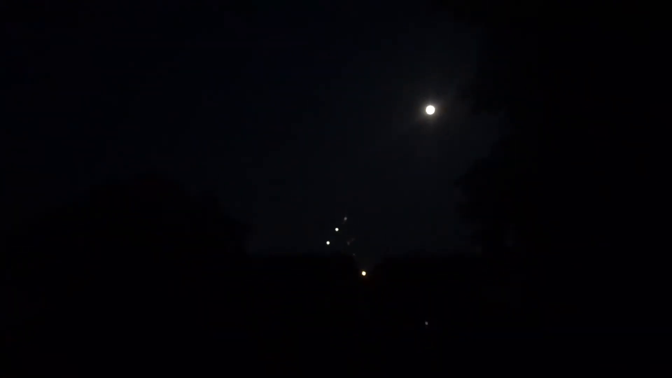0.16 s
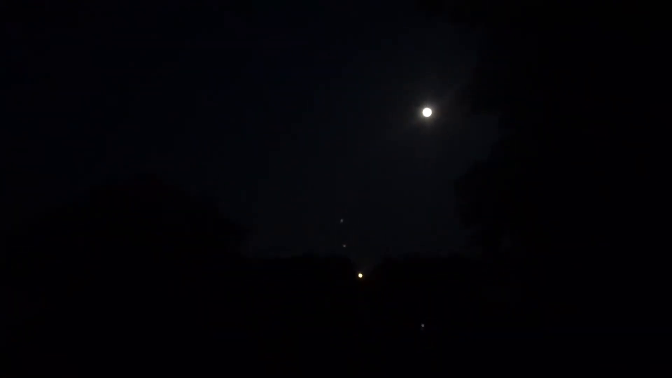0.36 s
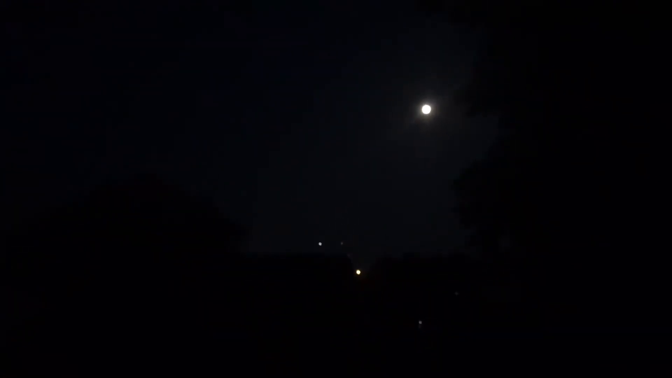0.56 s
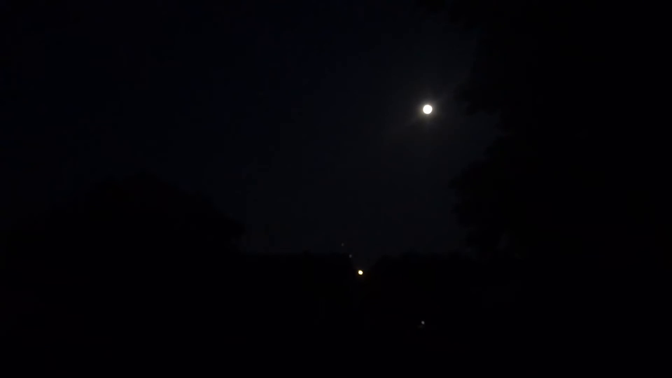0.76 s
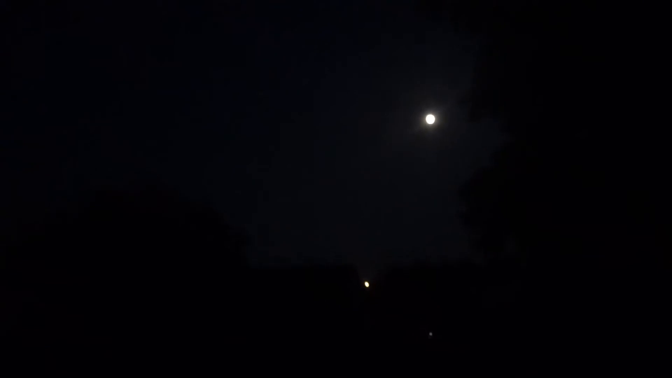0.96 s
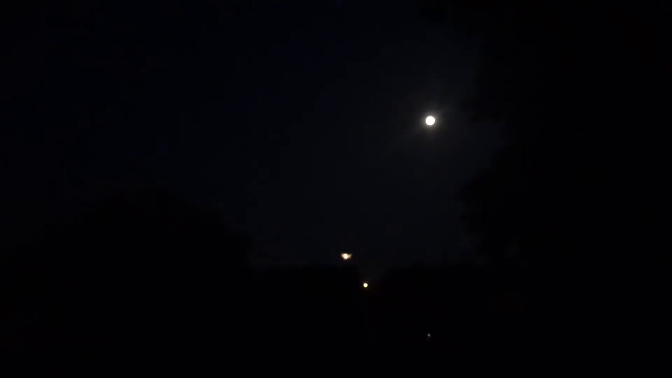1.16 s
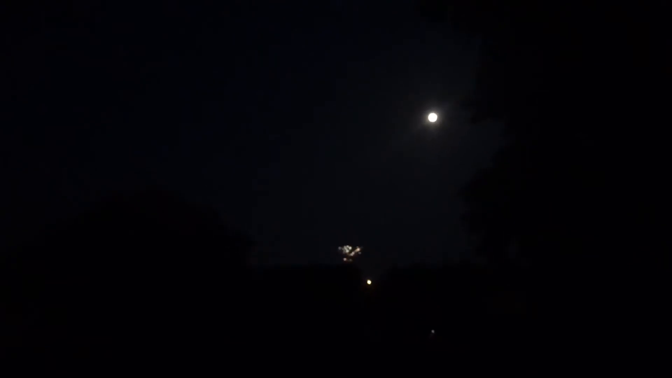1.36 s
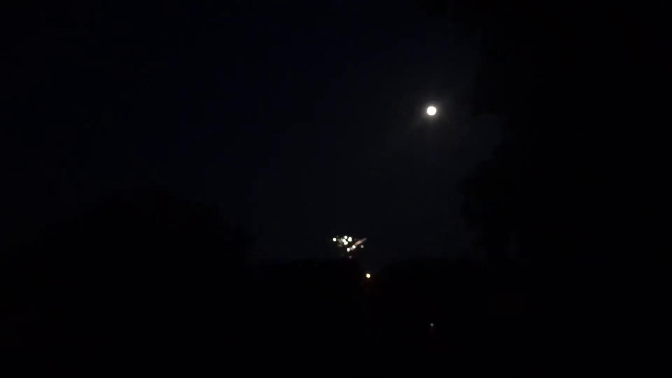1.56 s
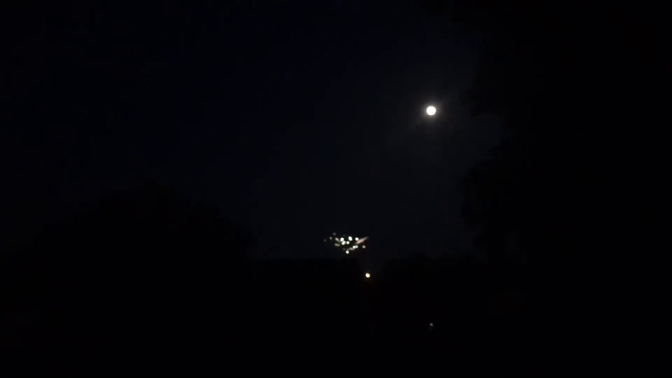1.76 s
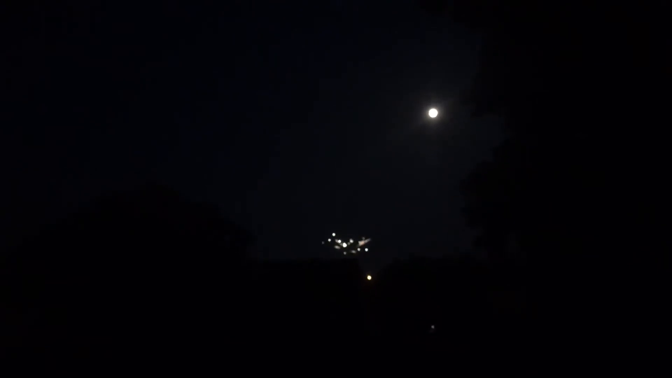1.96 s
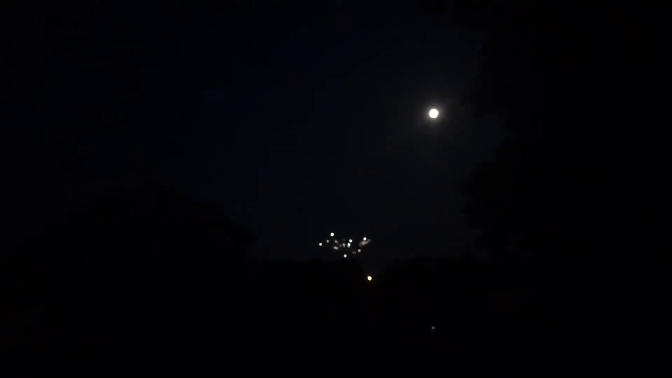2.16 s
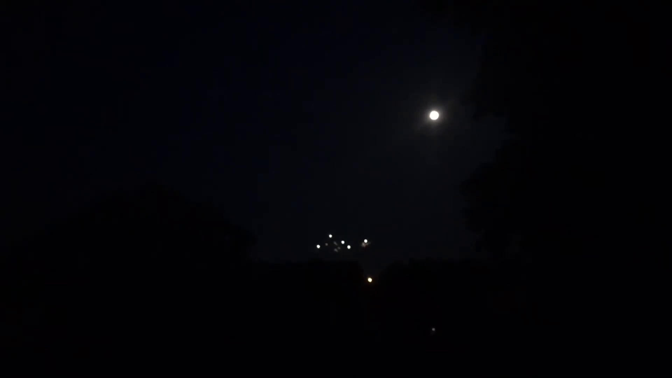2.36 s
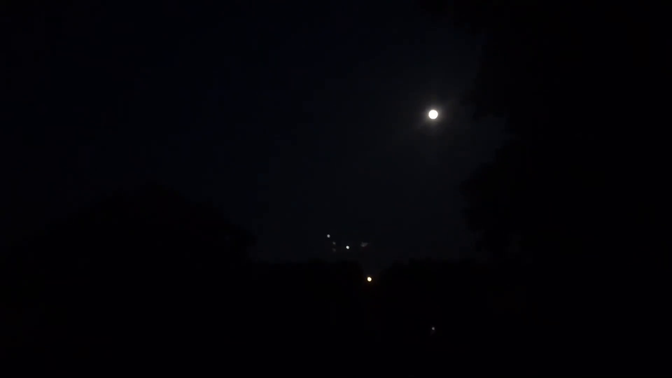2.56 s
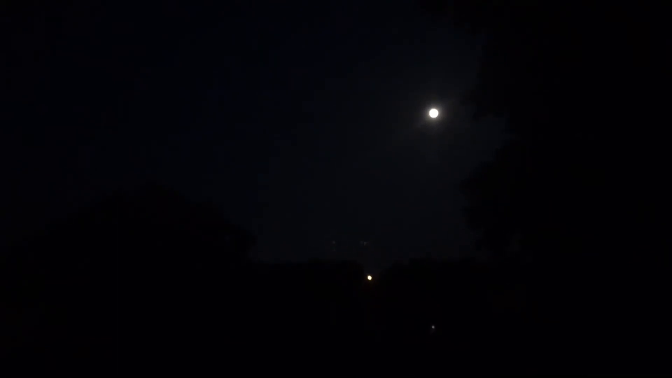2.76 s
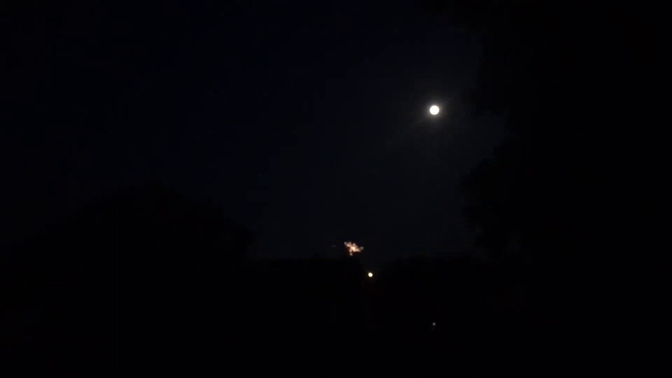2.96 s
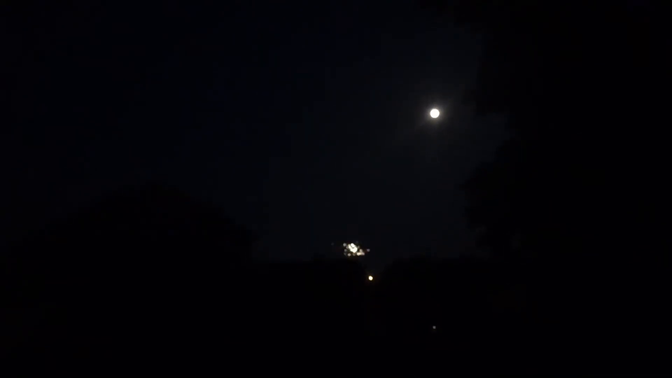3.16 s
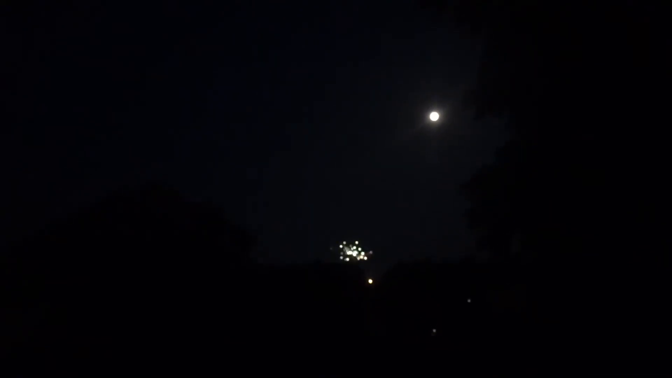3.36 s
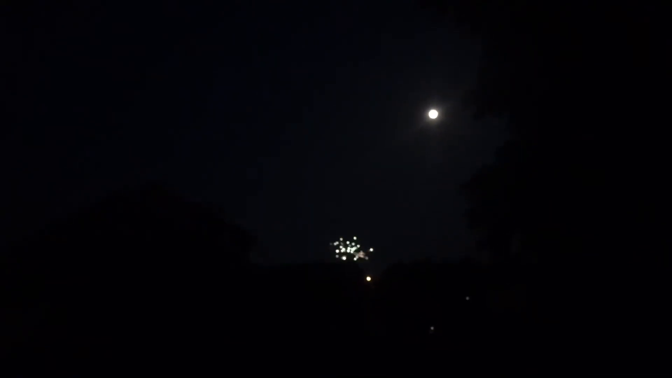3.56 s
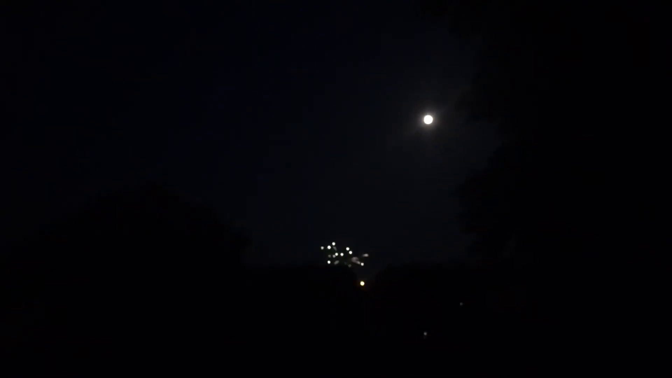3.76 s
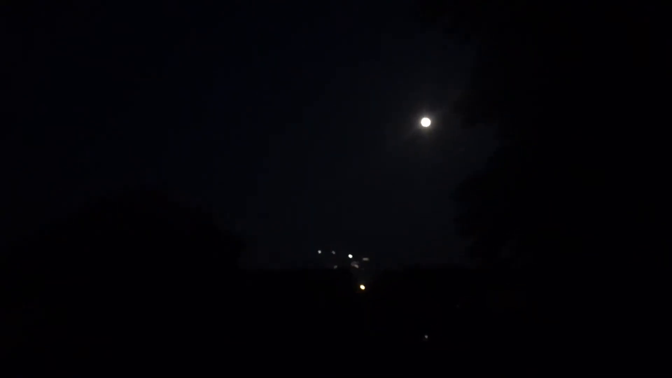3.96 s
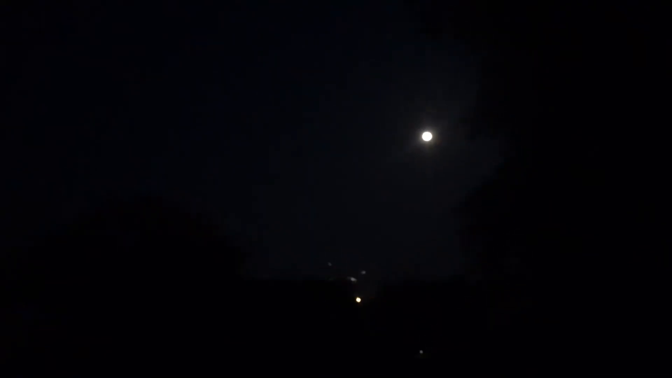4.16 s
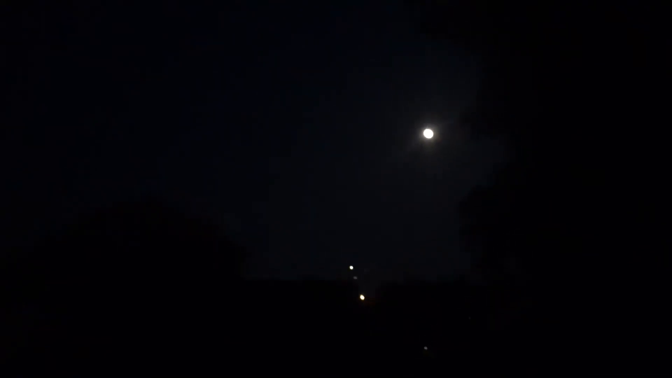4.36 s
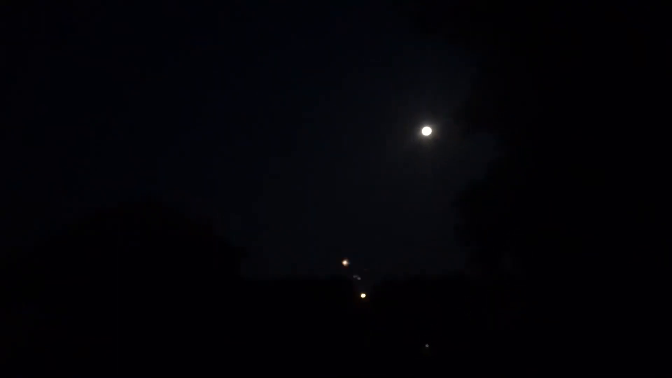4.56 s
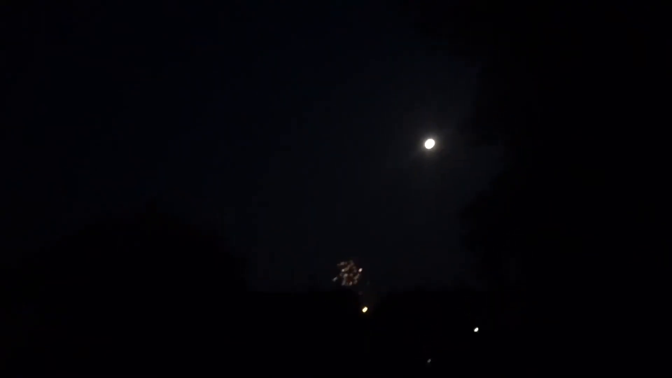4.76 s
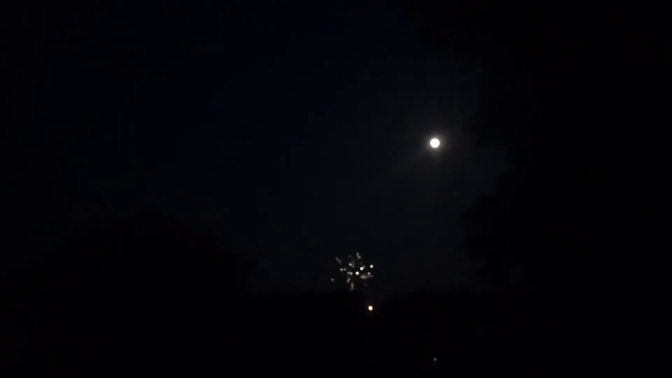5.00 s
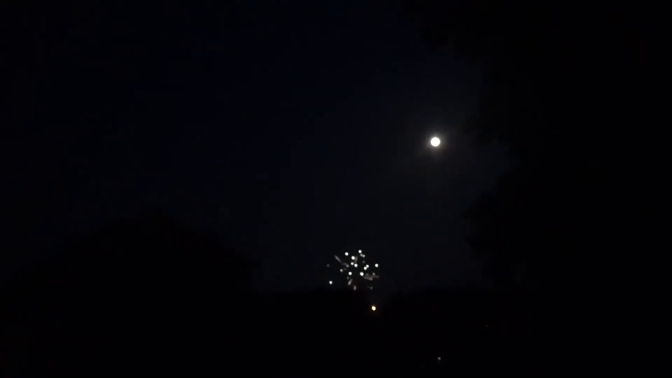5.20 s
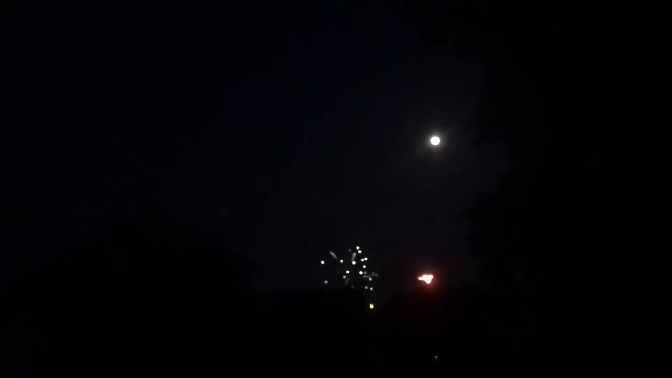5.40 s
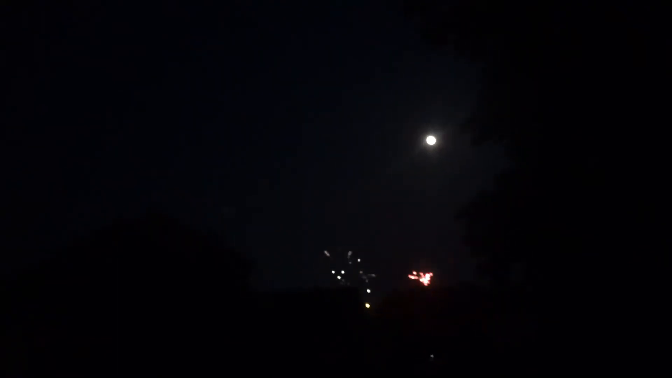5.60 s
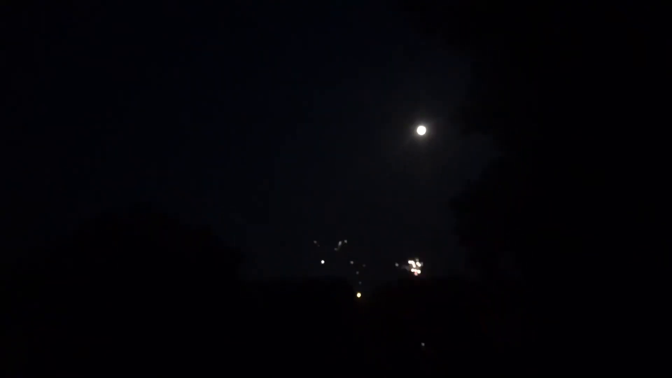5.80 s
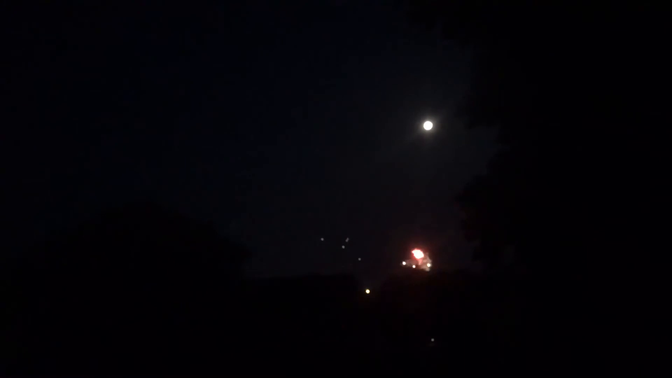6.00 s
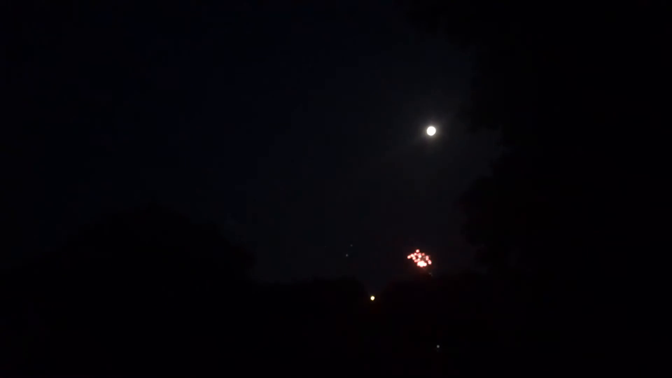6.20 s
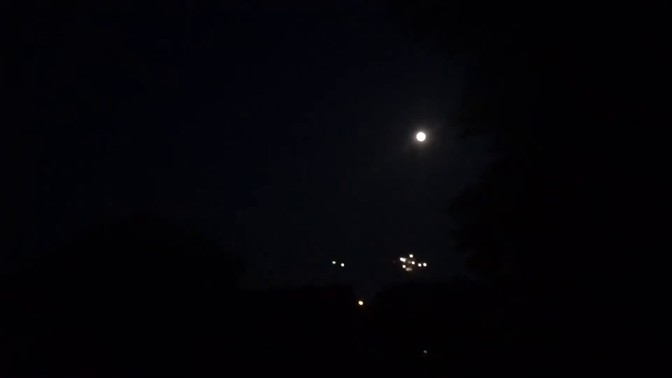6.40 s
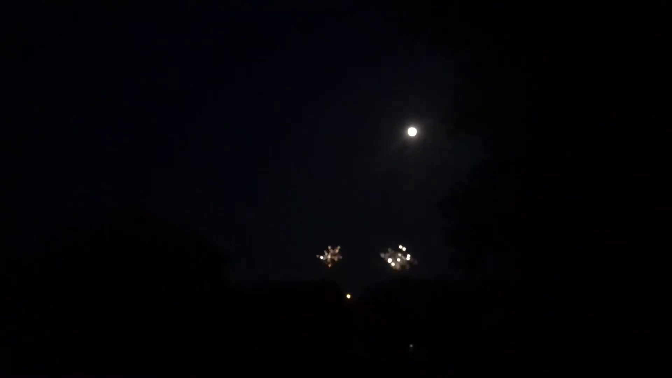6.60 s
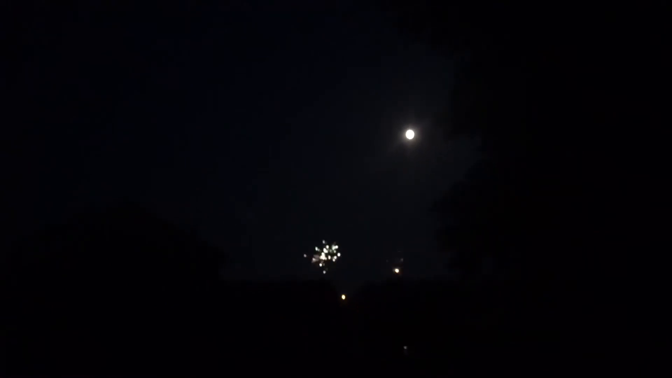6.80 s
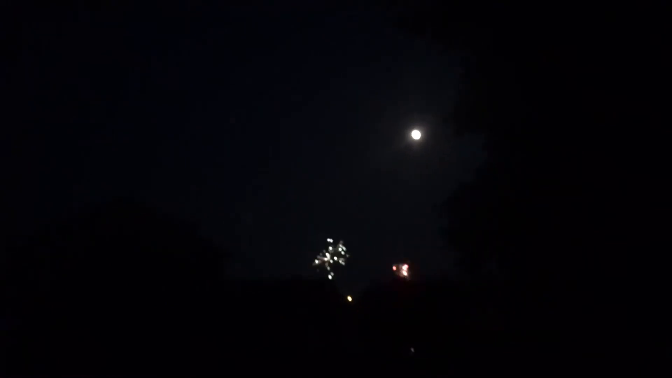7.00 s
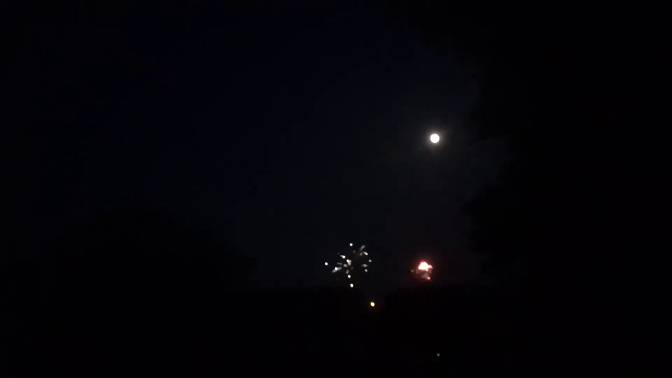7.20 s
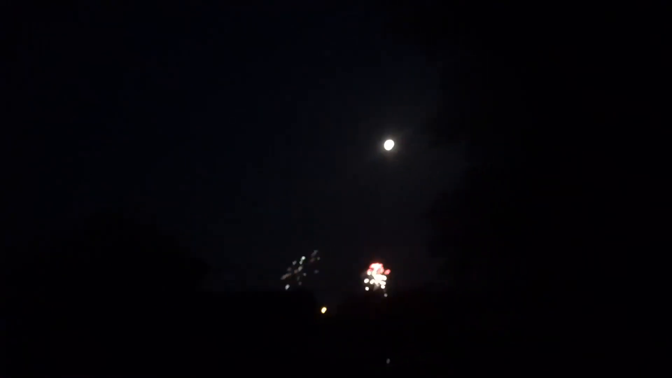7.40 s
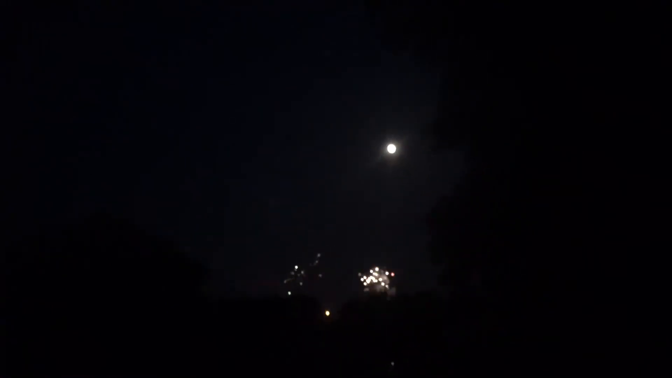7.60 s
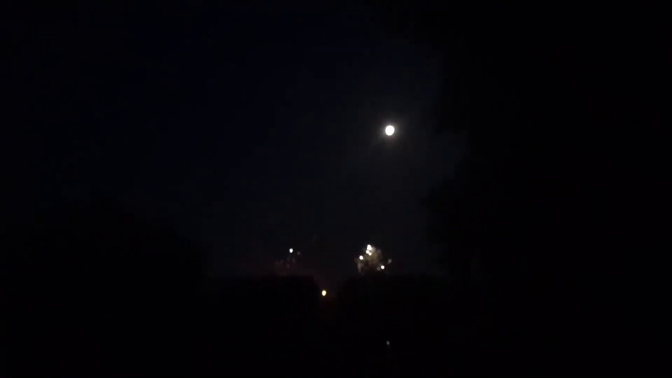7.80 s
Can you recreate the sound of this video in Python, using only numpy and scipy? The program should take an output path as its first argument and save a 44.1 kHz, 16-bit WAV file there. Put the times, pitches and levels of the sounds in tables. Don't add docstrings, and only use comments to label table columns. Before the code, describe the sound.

A night-time outdoor scene with distant fireworks beyond rooftops, heard on a handheld phone. It begins with the echo and fading tail of a bang just before the start, then settles into soft far traffic and a wavering low machinery hum, with light leaf rustle, tiny ticks and short cloth rubs close by. At 2.15 seconds the loudest bang cracks, dry and sharp, with a hard slap echo about 0.2 seconds later and a short rolling tail. A second strong bang comes at 3.9 with a brief faint crackle. A softer, doubled-sounding bang at 5.6 trails a longer gentle crackle. A weaker report follows at 6.6 with scattered ringing echoes. Around 7.05 the crackling is clearest, then two bangs close together at 7.2 and 7.47, the last short and sharp, leave overlapping echoes and a soft fizz to the end near 8 seconds.

```python
import sys
import numpy as np
from scipy import signal
from scipy.fft import rfft, irfft, next_fast_len
from scipy.io import wavfile
from scipy.ndimage import uniform_filter1d

SR = 44100
rng = np.random.default_rng(int(sys.argv[2]) if len(sys.argv) > 2 else 0)


def wrap_up_sound(samples):
    columns = np.atleast_2d(samples).T
    tamed = np.clip(columns, -1, 1)
    steps = np.round(tamed * 32767).astype(np.int16)
    wavfile.write(sys.argv[1], SR, steps)


def rack_gain(trim_db):
    fader = np.asarray(trim_db, float)
    return 10 ** (fader / 20)


N = 346185
LEAD = SR // 4
LENGTH = next_fast_len(N + LEAD)
HZ = np.arange(LENGTH // 2 + 1) * SR / LENGTH + 1e-3
CLOCK = (np.arange(LENGTH) - LEAD) / SR
JF = 1j * np.arange(1, 1025) * SR / 2048

# arrival in seconds, peak in dB,
# blast length in ms, lead of the early front in ms, early front in dB.
EARLY = [
    (-.1015, -1, 0.97, 2.2, -6.5),
]
SHELLS = [
    (2.15021, -1.6, 0.81, 2.21, -7.0),
    (3.86832, -2.9, 0.75, 2.19, -7.0),
    (5.58875, -5.9, 0.95, 2.22, -2.5),
    (6.56932, -8.2, 0.8, 2.13, -1.1),
    (7.19662, -6.5, 0.77, 1.92, -5.1),
    (7.46815, -6.3, 0.5, 1.88, -4.0),
]
# time in seconds, level in dB.
STIR = [(0.0, -68), (0.37, -76), (0.5, -71), (1.0, -68.5), (1.46, -69.5), (2.19, -70.5), (4.18, -69.5),
        (4.44, -64), (6.47, -71), (6.67, -74), (7.63, -70), (7.85, -66)]


def set_rms(x, db):
    return x * rack_gain(db) / np.sqrt(np.mean(x ** 2))


def colour(x, points):
    hz, db = np.transpose(points)
    gain = rack_gain(np.interp(np.log(HZ), np.log(hz), db))
    return irfft(rfft(x, LENGTH) * gain, LENGTH)


def curve(rows):
    s, db = np.transpose(rows)
    return rack_gain(np.interp(CLOCK, s, db, left=-120, right=db[-1]))


def after(s):
    return CLOCK - s


def walk(rate):
    hold = int(SR / rate)
    steps = np.repeat(rng.standard_normal(LENGTH // hold + 1), hold)
    return 1.2 * uniform_filter1d(steps, hold)[:LENGTH]


def grains(rate, spread_db):
    hits = rng.random(LENGTH) < rate / SR
    return hits * rng.standard_normal(LENGTH) * rack_gain(spread_db * rng.exponential(size=LENGTH))


def town():
    # frequency in Hz, level in dB per Hz.
    spectrum = [(15, 1), (25, -2), (75, -3.5), (194, -12), (350, -9.5), (687, -12), (950, -11), (1350, -17),
                (1670, -16.5), (2130, -23), (4410, -31.5), (4910, -37), (6260, -37.5), (13700, -61),
                (15600, -53)]
    # time in seconds, level in dB.
    swell = [(0, -43), (.4, -45.5), (1.9, -47.5), (2.3, -45), (3.4, -47), (4.1, -45.5), (5.4, -46),
             (5.8, -44), (6.4, -45.5), (7.3, -42.5), (7.85, -42)]
    return set_rms(colour(rng.standard_normal(LENGTH), spectrum), 1.68) * curve(swell)


def hum():
    # frequency in Hz, width in Hz, level in dB.
    lines = [(42.3, 6, -72), (58, 16, -53), (78.7, 2.8, -55), (80.7, 9.6, -58), (120.6, 12, -60.5),
             (150.3, 5.8, -71.5)]
    noise = rfft(rng.standard_normal(LENGTH))
    total = 0
    for hz, width, db in lines:
        resonance = 1 / (1 + (2 * (HZ - hz) / width) ** 2)
        total = total + set_rms(irfft(noise * resonance, LENGTH), db)
    return total


def twig_snaps():
    # time in seconds, peak in dB, held to -40 at most. Those at 2.147 and 3.8665 s sound with the two
    ticks = [(0.354, -44), (0.7621, -54), (1.1746, -53), (1.5622, -60), (1.691, -52), (2.147, -28),
             (2.8698, -48), (3.1453, -50), (3.2237, -39), (3.4375, -45.5), (3.695, -40), (3.789, -40),
             (3.8665, -35), (4.4297, -55), (4.537, -69), (4.5919, -38), (4.95, -55), (5.0972, -54),
             (5.3456, -57), (5.5447, -44), (6.0565, -45), (6.2232, -53), (6.4486, -49), (6.4881, -48),
             (6.932, -49), (6.9705, -43), (7.1106, -47), (7.4055, -56), (7.5616, -42), (7.8046, -43)]
    patter_per_s, patter_db, spread_db = 22, -57, 2.2
    hits = rng.random(LENGTH) < patter_per_s / SR
    strikes = hits * rack_gain(patter_db + spread_db * rng.standard_normal(LENGTH))
    for s, db in ticks:
        strikes[int(s * SR) + LEAD] = rack_gain(min(db, -40))
    t = np.arange(SR // 10) / SR
    t60_s, rise_s = 0.036, 0.0005
    decay = rack_gain(-9.5 - 60 * t / t60_s) * np.clip(t / rise_s, 0, 1)
    return signal.fftconvolve(strikes, decay)[:LENGTH]


def cloth_rubs():
    # start in seconds, length in seconds, level in dB.
    rubs = [(0.36, 0.092, -59), (.5, 0.043, -57), (0.595, .11, -63), (0.773, 0.04, -62),
            (1.175, 0.052, -54.5), (1.374, 0.034, -64), (1.69, 0.08, -65), (2.058, 0.042, -67),
            (2.345, 0.028, -57), (2.77, 0.036, -61), (2.903, .05, -63), (3.026, 0.059, -61),
            (3.362, 0.045, -59.5), (3.607, 0.061, -64), (3.697, 0.032, -59), (4.04, 0.036, -77),
            (4.31, 0.038, -61), (4.603, 0.037, -70), (4.85, 0.038, -64), (4.95, 0.039, -69),
            (5.136, 0.045, -56), (5.212, 0.085, -59.5), (5.47, 0.035, -66), (5.566, 0.057, -53),
            (5.765, 0.044, -62), (6.2, 0.068, -62), (6.44, .03, -63), (6.547, 0.067, -58),
            (6.829, 0.034, -54), (6.956, 0.036, -61)]
    attack_s, release_s = 0.008, 0.0069
    total = 0
    for s, length, db in rubs:
        edges = np.minimum(after(s) / attack_s, 1 - after(s + length) / release_s)
        total = total + rack_gain(db - 8.5) * np.clip(edges, 0, 1)
    return total


def fibres():
    return set_rms(grains(8000, 1.5), 0)


def rustle():
    # frequency in Hz, level in dB per Hz.
    spectrum = [(1470, -11), (2500, -6), (3120, 0), (3400, -8), (4580, -2.5), (4870, -5.5), (6380, -2.5),
                (6940, -4.5), (10300, -11), (13400, -17), (15600, -23)]
    snaps, rubs = twig_snaps(), cloth_rubs()
    gusts = rack_gain(1.6 * walk(22))
    stir = snaps + (rubs + curve(STIR) * gusts) * rack_gain(1.6 * walk(60))
    coarse = colour(fibres() * stir * rack_gain(1.7 * walk(70)), [(7000, -3), (11000, -18)])
    even = .6 * stir + curve(STIR) * rack_gain(-3 + 1.4 * walk(45))
    fine = colour(fibres() * even * rack_gain(1.7 * walk(80)), [(7000, -11.5), (11000, -1)])
    return rack_gain(16.5) * colour(coarse + fine, spectrum)


def crackle():
    # start in seconds, swell in seconds, hold in seconds, level in dB.
    stars = [
        (3.864, .03, 0.045, -45.5),
        (5.567, 0.045, 0.27, -51.5),
        (6.77, .03, 0.038, -68),
        (7.05, .07, 0.13, -41.5),
        (7.33, .08, 0.088, -46.5),
        (7.557, 0.24, .2, -48.5),
    ]
    dense = grains(3000, 1.5) * rack_gain(1.6 * walk(120))
    pops = colour(dense, [(300, -25), (900, -5), (1700, 0), (3000, -4), (4500, -9),
                          (7000, -23), (10000, -40), (16000, -60)])
    swell_db, fade_db_per_s = 15, 121
    burn = 0
    for s, swell, hold, db in stars:
        rise = swell_db * np.clip(1 - after(s) / swell, 0, 1)
        fade = fade_db_per_s * np.clip(after(s + swell + hold), 0, 1)
        burn = burn + (after(s) > 0) * rack_gain(db - rise - fade)
    return set_rms(pops, 0) * burn


def front(ms, dull):
    ground = (493, 667, 1270)
    # centre in Hz, width in Hz.
    spread = (771, 1050)
    half = np.pi * JF.imag * ms / 1000
    wave = 1j * (np.sin(half) / half - np.cos(half)) / half * np.exp(-1j * half)
    ring = JF ** 2 / (ground[0] ** 2 + JF * ground[1] + JF ** 2) / (JF + ground[2])
    centre, width = spread[0] ** 2 + JF ** 2, JF * spread[1]
    lag = (centre - width) / (centre + width)
    return wave * ring * lag / (1 + JF * dull / 1000) ** 2


def ping(hz, damping):
    mode = JF * hz / (hz ** 2 + JF * hz * damping + JF ** 2)
    return mode ** 2 / (1 + JF / 7000) ** 3


def add(track, s, db, shape):
    at = s * SR + LEAD
    shift = np.exp(-2 * np.pi * JF * (at % 1) / SR)
    wave = irfft(np.append(0, shape * shift))
    wave = wave * rack_gain(db) / np.abs(wave).max()
    track[int(at):int(at) + len(wave)] += wave[:len(track) - int(at)]


def first_arrivals():
    # later front in dB, crack in dB, crack in Hz, snap in dB, thump in dB.
    blows = [(-17, -13, 3500, -32, -22), (-8, -12, 3480, -21.5, -15), (-16.5, -16, 3770, -26, -19.5),
             (-3.5, -15.5, 3100, -44, -12), (-13, -24, 3470, -51, -21), (-11, -19, 3960, -44, -19),
             (-15, -28, 3600, -32, -15.5)]
    # frequency in Hz, gain in dB.
    roof_colour = [(500, -1), (1050, 1.5), (1400, -4), (1750, -0.5), (2300, -2.5), (3200, 2), (5000, 0)]
    early_crack_db = -19
    first = np.zeros(LENGTH)
    for (s, db, ms, lead_ms, early_db), blow in zip([*EARLY, *SHELLS], blows):
        later_db, crack_db, hz, snap_db, thump_db = blow
        early = s - lead_ms / 1000
        add(first, s, db, front(ms, .86))
        add(first, early, db + early_db, front(1.57 * ms, 3.2))
        add(first, s + .00116, db + later_db, front(.74 * ms, 8.1))
        add(first, s + 0.00018, crack_db, ping(hz, 0.84))
        add(first, s + 0.00026, snap_db, ping(8000, 0.39))
        add(first, early + 0.000803, early_crack_db, ping(hz, 0.62))
        add(first, s - .002, thump_db, ping(228, 1.63))
    return colour(first, roof_colour)


def buildings(s, ms, facade, hard, house):
    delay, db, dull, face_db, setback_db = facade
    windows_db, face_windows_db, roofs_db = hard
    wall, wall_db, gable_db, shed, shed_db = house
    slap = s + delay
    face, setback = slap + .00755, slap + .00222
    return [(slap, db, front(ms, dull)),
            (face, db + face_db, front(ms, dull)),
            (setback, db + setback_db, front(2.5 * ms, dull)),
            (slap, windows_db, ping(1790, 0.55)),
            (face, face_windows_db, ping(1450, 0.82)),
            (s + .2856, roofs_db, ping(702, 0.23)),
            (s + wall, wall_db, front(ms, 0.42)),
            (s + wall - .0055, gable_db, ping(3050, 0.71)),
            (s + shed, shed_db, ping(1700, 0.69))]


def wall_echoes():
    # delay in seconds, peak in dB, dullness per kHz,
    # second face in dB, duller setback in dB.
    facades = [(.21736, -6.0, 0.41, -10.2, -17.5), (.21708, -3.0, 0.63, -13.8, -16.9),
               (.2172, -1.0, 0.72, -12.1, -19.1), (.21692, -2.7, 1.06, -10.9, -13.1),
               (.2169, -11.4, 1.2, -30.0, -6.2), (.21768, -14.1, 2.95, -19.4, -4.7),
               (.21868, -8.4, 1.13, -6.3, -12.8)]
    # facade windows, second face windows, stepped roofs, all in dB.
    hard_parts = [(-20, -35, -24), (-20.5, -48, -22.5), (-25, -33, -23), (-14, -23, -25), (-27, -40, -33.5),
                  (-19, -27, -28), (-17.5, -32, -28.5)]
    # delay in seconds, wall in dB, gable in dB, shed delay in seconds, shed in dB.
    houses = [(.1452, -16.5, -45, .1695, -32), (.1448, -16, -25.5, .1666, -22),
              (.1447, -20.5, -34, .1644, -26), (.1452, -17.5, -31, .169, -25),
              (.1427, -18.5, -45, .168, -42), (.1444, -17.5, -40, .17, -40),
              (.1468, -17.5, -33, .1703, -25.5)]
    # time in seconds, peak in dB, length in ms.
    strays = [(0.068, -34, 1), (2.227, -28, 0.53), (2.494, -32, 0.9), (5.758, -23, .95), (6.905, -27, 0.64),
              (7.034, -33, 0.99), (7.271, -29, 0.66), (7.385, -26, 0.58), (7.503, -25, 0.84),
              (7.639, -28, .9)]
    # frequency in Hz, gain in dB.
    wall_colour = [(500, -1), (950, 1), (1500, -1), (2300, -4), (3300, 2), (6000, 0.5)]
    # time in seconds, peak in dB, frequency in Hz, damping.
    glints = [(0.0432, -26.5, 1770, 1), (0.051, -32, 646, 0.57), (4.034, -29.5, 3600, 0.55),
              (4.2248, -33.5, 2120, 0.52), (5.5871, -16, 1590, 0.24), (6.5725, -19.5, 784, 0.25),
              (6.579, -21, 1010, 0.4), (6.604, -22, 1170, 0.29), (6.61, -22, 710, 0.83),
              (6.714, -25.5, 1690, 0.98), (6.781, -27, 890, .4), (6.793, -16.5, 1000, 0.3),
              (6.8122, -30.5, 2470, 0.36), (6.831, -27.5, 950, 0.3), (7.1699, -21.5, 1780, 0.55),
              (7.2469, -16.5, 875, 0.47)]
    # seconds, peak in dB, Hz, damping.
    edges = [
        (2.1497, -19, 1630, .25),
        (2.1500, -26, 5100, .15),
        (2.655, -33, 300, .5),
        (3.8680, -25, 1800, .3),
        (6.0960, -31, 260, .9),
        (6.5690, -26, 1950, .3),
        (7.4680, -26, 2400, .3),
    ]
    echoes = np.zeros(LENGTH)
    for shell, facade, hard, house in zip([*EARLY, *SHELLS], facades, hard_parts, houses):
        s, ms = shell[0], max(1.06 * shell[2], .78)
        for at, db, shape in buildings(s, ms, facade, hard, house):
            add(echoes, at, db, shape)
    for s, db, ms in strays:
        add(echoes, s, db, front(ms, 0.68))
    echoes = colour(echoes, wall_colour)
    for s, db, hz, damping in [*glints, *edges]:
        add(echoes, s, db, ping(hz, damping))
    return echoes


def tail(sound, groves, lumpy_db):
    # level in dB, t60 in seconds.
    scatter = [
        (-11, 0.066),
        (-31.5, 0.49),
        (-46.5, 4.3),
    ]
    # frequency in Hz, gain in dB.
    near_colour = [(60, 22), (200, -3.5), (700, -3.5), (1300, -2), (2500, 2), (4500, -4), (9000, -8)]
    far_colour = [(60, -7), (200, 4), (600, 0), (1200, 2.5), (2000, 13.5), (4000, 5), (8000, -3.5),
                  (15000, -19)]
    t = np.arange(2 * SR) / SR
    onset = np.clip(t / 0.0012 - 1, 0, 1)
    near, *far = [rack_gain(db - 60 * t / t60) * onset for db, t60 in scatter]
    for s, db, spread in groves:
        near = near + rack_gain(db) * np.exp(-.5 * ((t - s) / spread) ** 2)
    lumps = rack_gain(lumpy_db * walk(150)[:len(t)])
    chance = 0.12 * lumps * rng.standard_normal(len(t))
    paths = colour(near * chance, near_colour) + colour(sum(far) * chance, far_colour)
    return signal.fftconvolve(sound, paths[:len(t)])[:LENGTH]


def fireworks():
    # delay in seconds, level in dB, spread in seconds.
    groves = [(.011, -27.5, 0.0034), (0.034, -32.5, 0.0034), (.052, -53, 0.0062), (0.077, -29.5, .004),
              (0.099, -47.5, 0.0081), (0.171, -32.5, 0.0049), (0.207, -37, 0.014), (0.26, -36.5, 0.0053),
              (0.298, -40, 0.016), (0.344, -32, 0.0052), (0.522, -48.5, 0.064)]
    first, echoes = first_arrivals(), wall_echoes()
    first_tail = tail(first, groves, 3.5)
    echo_tail = rack_gain(-1.5) * tail(colour(echoes, [(1000, 0.5), (3000, 1.5)]), [], 0.67)
    return first + echoes + first_tail + echo_tail


def scene():
    mix = town() + hum() + rustle() + crackle() + fireworks()
    return mix[None, LEAD:LEAD + N]


def top_cut(x):
    return signal.sosfilt(signal.butter(12, 15800, fs=SR, output="sos"), x)


def record(dry):
    # frequency in Hz, width in Hz, gain in dB.
    case = [(361.6, 22, 4), (990, 370, 0), (1570, 220, 1.5), (1382, 164, -2), (3130, 130, -1),
            (4330, 230, 3.5), (5300, 1200, 0.5), (6240, 210, 2), (8740, 530, 3.5), (10500, 850, -4.5),
            (13300, 800, 2)]
    boost_db = sum(db / (1 + (2 * (HZ - hz) / width) ** 2) for hz, width, db in case)
    ends = (HZ < 15780) / (1 + (39 / HZ) ** 8)
    housed = irfft(rfft(dry, LENGTH) * rack_gain(boost_db) * ends, LENGTH)[:, :N]
    return top_cut(housed)


dry = scene()
out = record(dry)
wrap_up_sound(out)
```